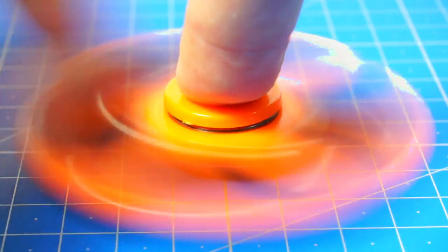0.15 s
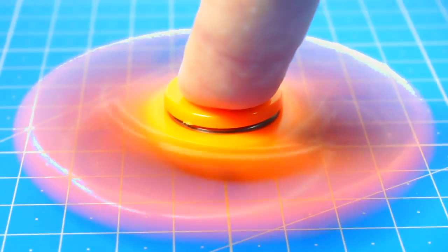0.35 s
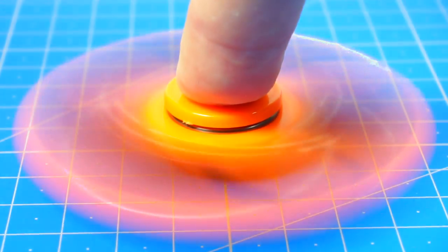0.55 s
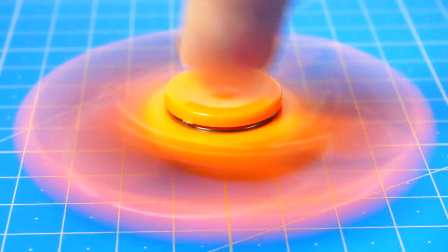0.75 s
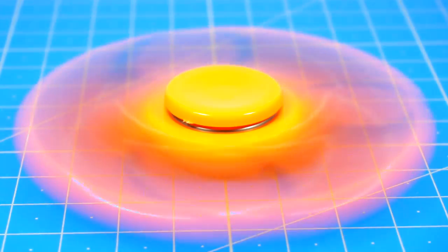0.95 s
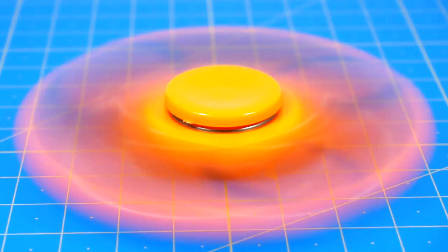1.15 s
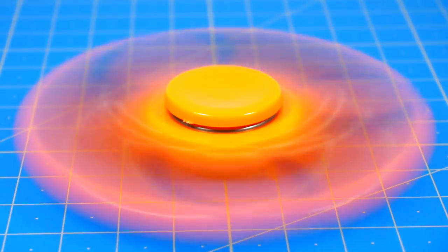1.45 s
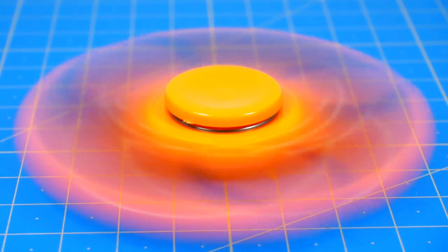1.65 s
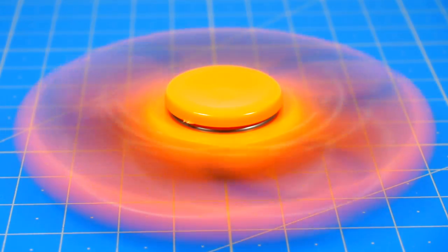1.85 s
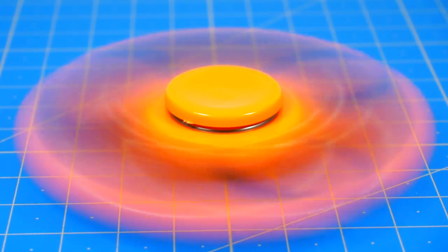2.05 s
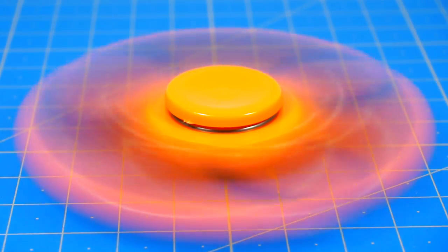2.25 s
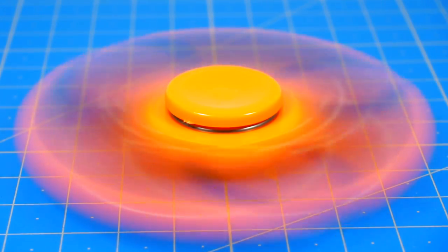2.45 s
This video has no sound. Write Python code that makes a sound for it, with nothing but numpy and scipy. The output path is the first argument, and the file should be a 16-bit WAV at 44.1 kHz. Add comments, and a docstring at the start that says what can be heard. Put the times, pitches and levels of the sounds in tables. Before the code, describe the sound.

Close up in a small, quiet room, a fidget spinner starts with a clack and a thump on a tabletop, then spins with a high, slightly pulsing bearing hiss and small rattles over a faint low drone.

```python
"""A nail scrapes off a fidget spinner, pinned to a table by one finger; the toy knocks and shudders.
Its bearing hisses as the balls roll over the grain of the race: muffled until the finger lifts,
then ringing freely and swelling with each lap. Loose balls chatter on the plastic body, grit crunches.
Underneath, the shaken tabletop drones faintly over a low hum in a small, quiet room."""
import sys
import numpy as np
from scipy import signal
from scipy.fft import rfft, irfft
from scipy.io import wavfile

SR = 44100
rng = np.random.default_rng(int(sys.argv[2]) if len(sys.argv) > 2 else 0)


def bounce(signal):
    """Save signal as a 16-bit WAV file at the path given by the first command-line argument."""
    frames = np.transpose(np.atleast_2d(signal))
    limited = np.clip(frames, -1, 1)
    pcm = np.round(limited * 32767).astype(np.int16)
    wavfile.write(sys.argv[1], SR, pcm)


N = 114660
T = np.arange(N) / SR

# bearing envelopes (time [s], held hiss [dB], free ring [dB], chatter [dB])
SPIN_LEVELS = [(0, -72, -103, -86), (.21, -51.5, -83, -87), (.245, -35, -68, -68), (.34, -36.5, -64, -46),
               (.55, -37, -53, -56), (.765, -37, -39, -66), (.79, -44, -35.5, -48.5),
               (1.05, -48.5, -34.5, -44), (1.6, -50, -33, -42), (2.3, -60, -33.5, -42.5),
               (2.6, -43, -34, -43)]
# harder catches of the balls on the race (time [s], boost [dB])
CATCHES = [(.529, 8.5), (.642, 6), (.7, 4), (1.865, 1.5), (2.135, 3), (2.331, 5)]
# resonances: held bearing, free bearing, plastic body, table (centre [Hz], width [Hz], level [dB])
HELD_MODES = [(616, 31, 2), (1044, 32, 9.5), (1476, 59, 5), (2046, 70, 2.5), (3370, 1400, -1.5),
              (5210, 410, 0), (9750, 320, 4.5), (10280, 400, 0), (14100, 1300, 2.5), (15900, 750, 6)]
FREE_MODES = [(5120, 346, -6), (6195, 290, -9), (6964, 240, -3.5), (7590, 600, -2.5), (7890, 214, 2),
              (8660, 1250, -10.5), (9900, 450, -5.5), (13150, 1670, -11), (14500, 850, -6.5),
              (15900, 1400, -4)]
BODY_MODES = [(1986, 133, -4), (2220, 140, -6.5), (2553, 130, 1.5), (2657, 140, -2.5)]
TABLE_MODES = [(95, 25, -8), (206, 33, -9.5), (287, 27, -5), (342, 76, -10.5)]
# broad spectra under those resonances (frequency [Hz], level [dB])
HELD_SPECTRUM = [(100, -36), (400, 5.5), (1100, 0), (4500, -3.5), (6300, -6.5), (8500, -3.5), (12000, -2.5),
                 (16000, -13)]
FREE_SPECTRUM = [(100, -33.5), (500, -13.5), (1050, -11), (1500, -15.5), (4400, -17.5), (5700, -38),
                 (11000, -21), (16000, -9)]
BODY_SPECTRUM = [(200, -25), (1000, -21), (2900, -11), (3400, -19.5), (8000, -13), (16000, -26.5)]
RATTLE_SPECTRUM = [(0, -60)]
TABLE_SPECTRUM = [(10, -35), (30, -18.5), (120, -8.5), (250, -10), (450, -16.5), (800, -29), (1600, -35.5),
                  (6000, -73)]
# hard ball strikes (time [s], level [dB])
RATTLES = [(.958, -19), (1.065, -20), (1.18, -16.5), (1.252, -14), (1.575, -13), (1.667, -15),
           (2.163, -13.5), (2.179, -9.5), (2.332, -13), (2.485, -15.5), (2.498, -16), (2.513, -10.5)]
# grit in the race (time [s], level [dB], t60 [s])
CRUNCHES = [(0.377, -25.5, 0.015), (1.573, -36.5, 0.13), (1.599, -42, 0.083)]
# toy hitting the table (time [s], thud [dB], clack [dB], tick [dB])
KNOCKS = [(0.2313, -12, -16, -14), (0.2401, -13, -15.5, -14.5), (0.2438, -26, -23, -14),
          (0.2558, -27, -23, -22), (0.265, -27, -24, -36), (0.279, -34, -20.5, -31), (0.315, -26, -24, -53)]
# joint modes of toy and table (frequency [Hz], level [dB], t60 [s])
THUD_MODES = [(113.8, -13, 0.27), (169.8, -13.5, 0.32), (211, -6, 0.19), (278.3, -9.5, 0.17),
              (352, -14, 0.33), (416, -13, 0.36), (515.5, -15, 0.18), (576, -17, 0.3), (622, -12, 0.21),
              (730, -16, 0.22), (792, -10, 0.2), (810, -21, 0.25), (1044, -15, 0.23), (1389, -22.5, 0.22),
              (1773, -18, 0.13), (1812, -18, 0.11), (2000, -22, 0.2)]
# judder during spin-up (time [s], pitch [Hz], level [dB])
SHUDDER_TRACK = [(.255, 376, -30), (.27, 353.7, -22), (.289, 276, -19), (.301, 269, -29),
                 (.318, 298, -17.5), (.335, 277, -27), (.36, 268, -44)]
# toy rocking, finger letting go (start [s], pitch [Hz], level [dB], rise [s])
BUMPS = [(.391, 359.6, -28, 0.0052), (.797, 215, -36, 0.0099), (.801, 287.5, -33.5, 0.012),
         (.812, 403, -43, 0.023)]
# noise spectra (frequency [Hz], level [dB])
GRIT_SPECTRUM = [(200, -7), (1500, 4), (7000, -2), (16000, -11)]
NAIL_SPECTRUM = [(500, -16), (4400, -15), (6500, -4.5), (9000, -4.5), (12000, 3), (16000, -0.5)]
CLACK_SPECTRUM = [(60, -8), (200, 15.5), (800, 2.5), (1200, -3.5), (2000, -6), (2900, -11), (6000, -19.5),
                  (16000, -37)]
TICK_SPECTRUM = [(500, -39), (3500, 1), (5500, 2.5), (8000, -7), (11000, 14), (16000, -16)]
ROOM_SPECTRUM = [(20, -2), (100, -2), (250, -10.5), (700, -14.5), (3000, -22.5), (16000, -21)]
# envelopes: table rumble, table's main note, hum (time [s], level [dB])
RUMBLE_LEVEL = [(0, -79), (.11, -60), (.15, -48.5), (.22, -43.5), (.25, -52), (.42, -40), (.52, -45),
                (.78, -46.5), (1.3, -44.5), (1.95, -47), (2.6, -44)]
NOTE_LEVEL = [(.71, -59), (.76, -44), (.82, -53), (.88, -45.5), (1.02, -44), (1.09, -57), (1.16, -42.5),
              (1.22, -58), (1.3, -46.5), (1.45, -52.5), (1.64, -48), (1.696, -41), (1.745, -53),
              (1.784, -44.5), (1.85, -56), (2.11, -48.5), (2.17, -83), (2.38, -51), (2.6, -57)]
HUM_LEVEL = [(0, -61), (.15, -54.5), (1.08, -57), (1.3, -44), (1.55, -46), (1.8, -48), (2.03, -60.5),
             (2.38, -52), (2.6, -50)]
# stereo width (frequency [Hz], side minus mid [dB])
SPIN_WIDTH = [(60, -7), (300, -5), (600, 4), (1400, 0.5), (2000, -1.5), (2600, -1.5), (3500, 0), (5200, -3),
              (6400, -2), (7800, -7), (11000, -4.5), (15000, -5)]
FLICK_WIDTH = [(380, -34), (700, -15), (1300, -5), (2400, -6), (4400, -2), (15000, -4)]
# stereo balance (frequency [Hz], left minus right [dB])
BALANCE = [(1300, 0), (2000, -3.5), (2700, -0.5), (6500, 2), (8000, 1.5), (15000, 0)]

PULSE_SIGMA_S, UNEVEN_HZ = .0045, 91


def amp(db):
    """Decibels to gain."""
    return 10 ** (np.asarray(db) / 20)


def unit(x):
    """Scale to rms 1."""
    return x / np.sqrt(np.mean(x ** 2) + 1e-20)


def curve(rows, column=1):
    """One column of a time table at every sample."""
    rows = np.array(rows)
    return np.interp(T, rows[:, 0], rows[:, column])


def spectrum_db(points, hz):
    """Spectrum table interpolated over log frequency."""
    points_hz, db = np.transpose(points)
    return np.interp(np.log(hz + 1), np.log(points_hz + 1), db)


def colour(x, spectrum, modes=(), size=8192):
    """Unit-energy filter: broad spectrum plus resonances."""
    hz = np.fft.rfftfreq(size, 1 / SR)
    power = amp(spectrum_db(spectrum, hz)) ** 2
    for centre_hz, width_hz, db in modes:
        power += amp(db) ** 2 / (1 + 2 * ((hz - centre_hz) / width_hz) ** 2) ** 2
    cepstrum = irfft(np.log(power + 1e-12) / 2)
    cepstrum[1:size // 2] *= 2  # fold to minimum phase
    cepstrum[size // 2 + 1:] = 0
    ring = irfft(np.exp(rfft(cepstrum)))
    return signal.oaconvolve(x, ring / np.linalg.norm(ring))[:N]


def wobble(cutoff_hz):
    """Low-passed random drift, rms 1."""
    hz = np.fft.rfftfreq(N, 1 / SR)
    return unit(irfft(rfft(rng.standard_normal(N)) * np.exp(-(hz / cutoff_hz) ** 2), N))


def grains(per_s, spread_db):
    """Tiny random contacts, mostly weak, rms 1."""
    strength = amp(spread_db * np.minimum(rng.exponential(1, N), 5))
    return unit(strength * rng.choice([-1, 1], N) * (rng.random(N) < per_s / SR))


def decay(start_s, t60_s):
    """Instant onset, exponential fall."""
    return (T >= start_s) * np.exp(-np.log(1000) * np.maximum(T - start_s, 0) / t60_s)


def lap_pulses(lap_hz=15.7, slowing_hz_per_s=.56, pass_s=.828):
    """Zero-mean pulses as the slowing balls pass the race's tight spot."""
    t = T - pass_s
    laps = lap_hz * t - slowing_hz_per_s * t ** 2 / 2
    offset_s = np.sin(np.pi * laps) / (np.pi * lap_hz)
    pulses = np.exp(-(offset_s / PULSE_SIGMA_S) ** 2 / 2)
    return pulses - pulses.mean()


def bearing(uneven_db=.87, lap_db=5.5):
    """Balls roll on the race: damped under the finger, then ringing; brighter at laps and catches."""
    contacts = grains(per_s=6000, spread_db=2.5) * amp(uneven_db * wobble(UNEVEN_HZ))
    held = colour(contacts * amp(curve(SPIN_LEVELS, column=1)), HELD_SPECTRUM, HELD_MODES)
    contacts = grains(per_s=14000, spread_db=2) * amp(uneven_db * wobble(UNEVEN_HZ))
    free = colour(contacts * amp(curve(SPIN_LEVELS, column=2)), FREE_SPECTRUM, FREE_MODES)
    catch_band = signal.butter(2, [6500, 11500], "band", fs=SR, output="sos")
    catch_db = sum(db * np.exp(-((T - at_s) / PULSE_SIGMA_S) ** 2 / 2) for at_s, db in CATCHES)
    catches = signal.sosfiltfilt(catch_band, held + free) * (amp(catch_db) - 1)
    race_band = signal.butter(2, [7000, 8600], "band", fs=SR, output="sos")
    swells = signal.sosfiltfilt(race_band, free) * (amp(lap_db * lap_pulses()) - 1)
    return held + free + catches + swells


def chatter(lap_dip_db=.5, uneven_db=.13):
    """Loose balls tap the plastic body; harder rattles ring only its resonances."""
    level_db = curve(SPIN_LEVELS, column=3) - lap_dip_db * lap_pulses() - uneven_db * wobble(UNEVEN_HZ)
    taps = grains(per_s=900, spread_db=2) * amp(level_db)
    rattles = np.zeros(N)
    for at_s, db in RATTLES:
        rattles[round(at_s * SR)] += amp(db)
    return colour(taps, BODY_SPECTRUM, BODY_MODES) + colour(rattles, RATTLE_SPECTRUM, BODY_MODES)


def grit():
    """Specks of dirt crushed under the balls."""
    envelope = sum(amp(db) * decay(at_s, t60_s) for at_s, db, t60_s in CRUNCHES)
    return colour(envelope * rng.standard_normal(N), GRIT_SPECTRUM)


def scrape(start_s=.2173, rise_s=.0028, fade_after_s=.0066, fade_s=.0052, level_db=-18):
    """The nail slips off the rim: a brief, bright rasp."""
    t = T - start_s
    envelope = np.clip(t / rise_s, 0, 1) * np.exp(-np.maximum(t - fade_after_s, 0) / fade_s)
    return amp(level_db) * colour(envelope * rng.standard_normal(N), NAIL_SPECTRUM)


def knocks(thud_rise_s=.0018, clack_t60_s=.15, tick_t60_s=.011):
    """The toy hits the table: modal thud, plastic clack, tick. Blows add in energy."""
    blow_energy, clack_power, tick_power = np.zeros((3, N))
    for at_s, thud_db, clack_db, tick_db in KNOCKS:
        blow_energy[round(at_s * SR)] += amp(thud_db) ** 2
        clack_power += (amp(clack_db) * decay(at_s, clack_t60_s)) ** 2
        tick_power += (amp(tick_db) * decay(at_s, tick_t60_s)) ** 2
    t = T[:SR // 2]
    thud = np.zeros(N)
    for hz, db, t60_s in THUD_MODES:
        ring = amp(db - 60 * t / t60_s) * (1 - np.exp(-t / thud_rise_s))
        envelope = np.sqrt(abs(signal.fftconvolve(blow_energy, ring ** 2)[:N]))
        thud += envelope * np.sin(2 * np.pi * hz * (T - KNOCKS[0][0]))
    clack = colour(np.sqrt(clack_power) * rng.standard_normal(N), CLACK_SPECTRUM)
    tick = colour(np.sqrt(tick_power) * rng.standard_normal(N), TICK_SPECTRUM)
    return thud + clack + tick


def shudder(octave_db=-20):
    """The rocking toy judders on the table: a short falling tone."""
    active = (T > SHUDDER_TRACK[0][0]) & (T < SHUDDER_TRACK[-1][0])
    phase = 2 * np.pi * np.cumsum(curve(SHUDDER_TRACK) * active) / SR
    envelope = amp(curve(SHUDDER_TRACK, column=2)) * active
    return np.sqrt(2) * envelope * (np.sin(phase) + amp(octave_db) * np.sin(2 * phase))


def bumps():
    """The finger pad rocks the toy: soft, low notes without a click."""
    notes = np.zeros(N)
    for start_s, hz, db, rise_s in BUMPS:
        t = np.maximum(T - start_s, 0)
        envelope = amp(db) * t / rise_s * np.exp(1 - t / rise_s)
        notes += envelope * np.sin(2 * np.pi * hz * t)
    return np.sqrt(2) * notes


def tabletop(note_hz=281.4, waver_hz=7.52):
    """The bearing shakes the table's low modes and keeps its main note ringing."""
    rumble = colour(rng.standard_normal(N), TABLE_SPECTRUM, TABLE_MODES) * amp(curve(RUMBLE_LEVEL))
    pitch_hz = note_hz + waver_hz * wobble(cutoff_hz=11.53)
    note = np.sqrt(2) * np.sin(2 * np.pi * np.cumsum(pitch_hz) / SR)
    return rumble + note * amp(curve(NOTE_LEVEL)) * (T > NOTE_LEVEL[0][0])


def hum(hz=49.5):
    """A low hum swells and fades."""
    return np.sqrt(2) * np.sin(2 * np.pi * hz * T) * amp(curve(HUM_LEVEL))


def room_tone(level_db=-57):
    """Steady noise of a quiet room."""
    return amp(level_db) * colour(rng.standard_normal(N), ROOM_SPECTRUM)


def reflections(x, gap_s=.004, t60_s=.11):
    """Short diffuse tail of a small room."""
    tail = rng.standard_normal(SR // 3) * decay(gap_s, t60_s)[:SR // 3]
    return signal.oaconvolve(x, tail / np.linalg.norm(tail))[:N]


def stereo(x, width, room_db):
    """Direct sound in the mid, reflections in mid and side; balance varies with frequency."""
    hz = np.fft.rfftfreq(N, 1 / SR)
    mid = rfft(x + amp(room_db) * reflections(x)) / np.hypot(1, amp(room_db))
    side = rfft(reflections(x)) * amp(spectrum_db(width, hz))
    lean = amp(spectrum_db(BALANCE, hz) / 2)
    return irfft([(mid + side) * lean, (mid - side) / lean], N)


def scene():
    """The flick and the long spin, close up in a quiet room."""
    flick = scrape() + knocks() + shudder() + bumps()
    spin = bearing() + chatter() + grit() + tabletop() + room_tone()
    return stereo(flick, FLICK_WIDTH, room_db=-16) + stereo(spin, SPIN_WIDTH, room_db=-12) + hum()


def record(dry):
    """Steep low-pass."""
    cutoff_hz = 15760
    lowpass = signal.firwin(1023, cutoff_hz, window=("kaiser", 8), fs=SR)
    return signal.oaconvolve(dry, lowpass[None], "same")


dry = scene()
out = record(dry)
bounce(out)
```